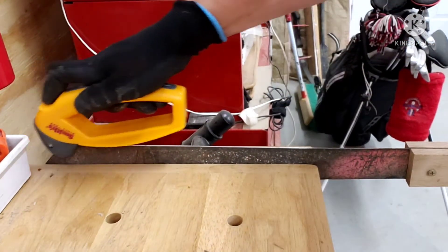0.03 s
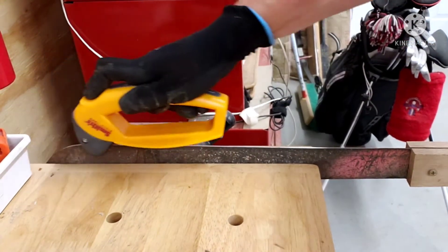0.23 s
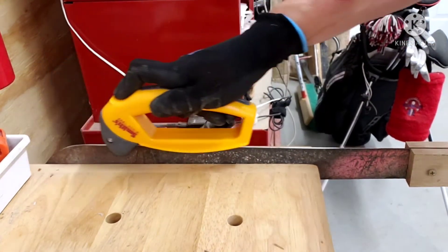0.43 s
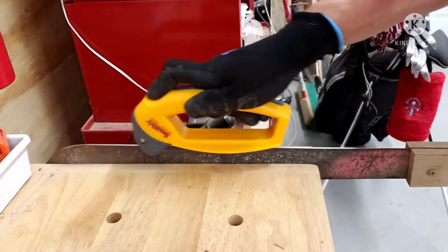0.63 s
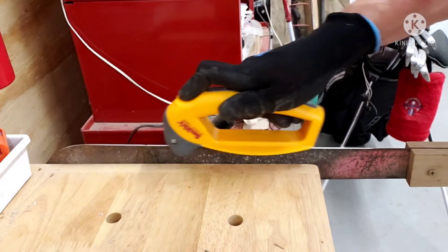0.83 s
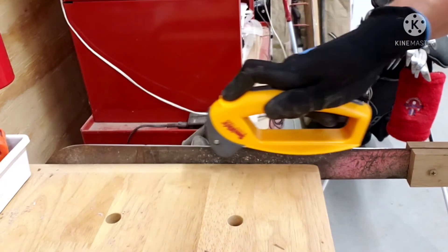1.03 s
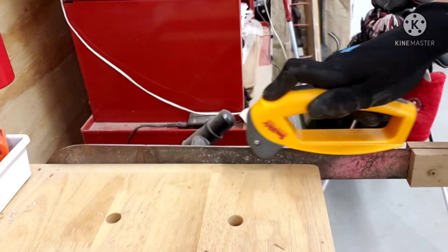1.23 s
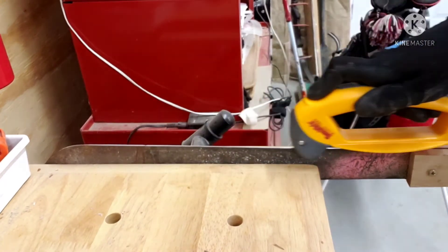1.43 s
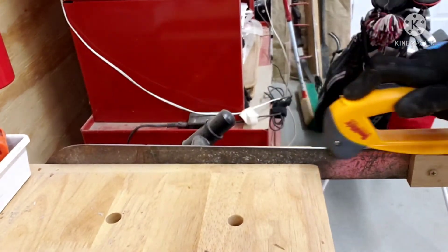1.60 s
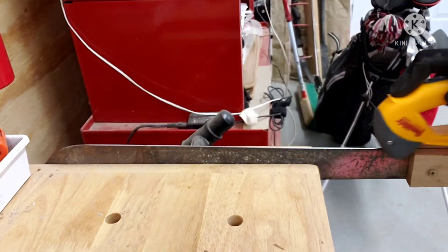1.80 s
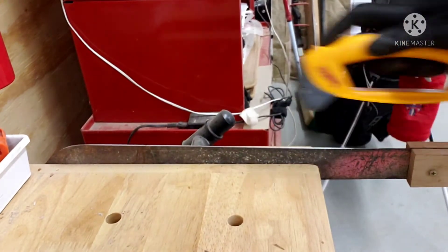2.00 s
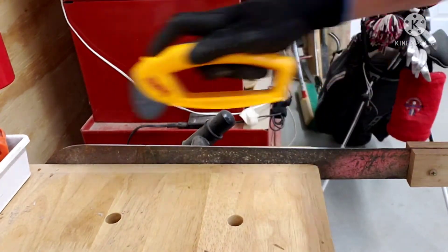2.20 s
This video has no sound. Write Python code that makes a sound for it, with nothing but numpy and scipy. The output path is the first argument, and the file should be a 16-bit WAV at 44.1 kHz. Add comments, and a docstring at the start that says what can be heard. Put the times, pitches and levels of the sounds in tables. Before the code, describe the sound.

A hand sharpener scrapes once along a steel blade, hissing, then drops off with a thump.

```python
"""A hand-held sharpener is drawn once along a machete clamped to a wooden bench in a small workshop.
Its carbide edge tears a dense stream of tiny chips: bright hiss, rasp, brief squeals, the growl and
ring of the blade, a rumble in the bench. It catches on a few nicks, then drops off with a thump;
the blade twangs and the room rings out. The returning hand swishes faintly over quiet room tone."""
import sys
import numpy as np
from scipy import signal
from scipy.fft import rfft, irfft, next_fast_len
from scipy.io import wavfile
from scipy.ndimage import map_coordinates

SR = 44100
rng = np.random.default_rng(int(sys.argv[2]) if len(sys.argv) > 2 else 0)


def master_out(mix):
    """Clip the mix to full scale and print it as 16-bit PCM to the path in sys.argv[1]."""
    frames = np.transpose(np.atleast_2d(mix))
    ceiling = np.clip(frames, -1, 1)
    pcm = np.round(ceiling * 32767).astype(np.int16)
    wavfile.write(sys.argv[1], SR, pcm)


N = 103635

# Spectral shapes: freq_hz, relative_db
ROOM_TONE_EQ = [(20,-15.5),(50,2),(150,-5.5),(400,-7),(750,-10),(1500,-17),(10500,-20),(15000,-12.5)]
SWISH_EQ = [(9000,-24.5),(11300,-12.5),(12000,-0.5),(15000,-4.5)]
THUMP_EQ = [(25,-31),(65,3.5),(130,3),(210,0),(320,5),(430,1.5),(560,-10),(1000,-19),(3000,-25)]
CLICK_EQ = [(200,-29.5),(700,6),(1000,18.5),(1500,-1),(1900,-1.5),(3000,5),(7000,-14.5),(10000,-30)]
RUMBLE_EQ = [(40,-33),(65,-1.5),(90,4),(115,5),(160,-0.5),(200,-2.5),(300,0),(600,-20),(2000,-70.5)]
GROWL_EQ = [(100,-14),(190,0),(320,5.5),(550,2),(800,0.5),(950,-6.5),(1060,-3),(1200,4),(1500,-2.5),(1780,-3.5),(3000,-12.5)]
RASP_EQ = [(1000,-12),(1800,-8),(2150,13),(2600,9),(3200,4.5),(3650,2),(3850,4),(4200,0),(4600,4.5),(5300,4.5),(6000,4.5),(7000,5),(7450,8.5),(7850,3.5),(8300,-1.5),(12000,-8)]
HISS_EQ = [(6000,-49.5),(8300,-32),(9000,-9.5),(9600,-5.5),(10300,-5),(11000,-3),(11350,5.5),(12300,0),(13000,3.5),(13900,4),(14450,0.5),(15400,1)]
# Envelopes: time_s, relative_db
SWISH_LEVELS = [(2.1,-100),(2.27,-66.5),(2.35,-81.5)]
RUMBLE_LEVELS = [(0,-40),(.3,-47.5),(.7,-43.5),(.95,-56.5),(1.1,-52),(1.7,-64),(1.85,-53)]
GROWL_LEVELS = [(0.0, -76), (0.11, -29), (0.3, -33.5), (0.6, -35.5), (0.675, -32), (0.73, -39),
                (1.05, -38.5), (1.2, -40), (1.34, -37.5), (1.394, -33), (1.426, -45), (1.462, -33),
                (1.55, -42), (1.65, -35), (1.716, -32.5), (1.79, -40), (1.87, -45)]
# Stroke envelope: time_s, hiss_relative_db, rasp_relative_db
STROKE_LEVELS = [(0.0, -47, -46.5), (0.052, -44.5, -44), (0.11, -33, -37), (0.146, -37, -41),
                 (0.23, -25, -36), (0.32, -33.5, -42), (0.594, -32.5, -38.5), (0.678, -27.5, -35.5),
                 (0.7, -30.5, -37), (0.726, -26, -33.5), (0.8, -31.5, -36.5), (0.826, -25, -31),
                 (0.878, -28, -34.5), (0.92, -22, -30.5), (1.036, -25.5, -32.5), (1.23, -26.5, -36),
                 (1.258, -29.5, -38), (1.462, -21.5, -33), (1.542, -28.5, -38.5), (1.755, -31, -35),
                 (1.79, -36, -41), (1.89, -48, -44)]
# Room decay: freq_hz, t60_s
ROOM_DECAY = [(100,0.41),(300,0.37),(700,0.42),(2000,0.38),(5000,0.41),(13000,0.4)]
# Left/right likeness, diffuse and direct sound: freq_hz, coherence
ROOM_COHERENCE = [(100,.97),(300,.8),(700,.2),(1500,0)]
DIRECT_COHERENCE = [(100,.98),(300,.9),(600,.72),(950,.92),(1500,.65),(2500,.3),(6000,.2),(13000,.15)]
# Direct sound balance: freq_hz, left_minus_right_db
BALANCE = [(60,-3.5),(150,-6),(420,-7),(900,-5),(1900,2),(3800,-0.5),(7500,1.5),(13000,4.5)]
# Direct sound phase: freq_hz, left_lead_rad
PHASE_LEAD = [(60,.1),(250,0),(450,-.5),(800,-2.1),(1050,-1.9),(1400,-.4),(2400,-1),(3200,0),(5000,-2),(12000,-1.6)]
# Cutter at tip, one third, two thirds, near heel, heel: time_s
STATION_TIMES_S = [.15,.6,1.05,1.47,1.85]
# Clamped blade modes: pitch_hz, width_hz, level_db at each of the five stations
BLADE_MODES = [(150,12,-52.5,-49.5,-53.5,-44.5,-58.5),(244,14,-62,-50.5,-50.5,-57.5,-77.5),(427,58,-58,-63.5,-45,-47.5,-44),(678,110,-48,-46.5,-46,-57,-46.5),(773,120,-53,-54.5,-39.5,-48,-63.5),(941.6,35,-59.5,-55,-40,-49,-57.5),(1133,22,-52,-53,-49.5,-63.5,-71.5),(1380,64,-61,-67,-48,-41.5,-55)]
# Nicks and final drop: start_s, thump_db, click_db
CATCHES = [(.498,-31,-27),(.6705,-23,-23),(.678,-25,-34),(.6945,-20,-19),(1.096,-29,-18),(1.371,-30,-22),(1.454,-33,-21),(1.8965,-18,-26),(1.906,-24,-42)]
# Squeals and groans: centre_s, sigma_s, pitch_hz, width_hz, level_db
SQUEAL_EVENTS = [(.235,0.058,11500,170,-33.5),(0.21,0.078,745,70,-48),(0.473,0.14,2278,70,-44.5),(0.37,0.086,13600,297.5,-33.5),(1.2,0.09,7400,130,-39),(1.1,0.12,11350,310,-32),(1.44,0.081,12000,700,-24),(1.442,0.073,810,55,-37),(1.55,0.018,146,11,-43.5),(1.755,0.04,18000,300,-42),(1.848,0.011,470,290,-36)]

LIFT_S = 1.897  # tool leaves the edge
TIME_S = np.arange(N) / SR


def amp(db):
    """Decibels to gain."""
    return 10 ** (np.asarray(db) / 20)


def unit_rms(x):
    return x / np.sqrt(np.mean(x ** 2) + 1e-20)


def unit_peak(x):
    return x / np.abs(x).max()


def impulse(start_s):
    return 1.0 * (np.arange(N) == round(start_s * SR))


def at_hz(points, hz):
    """Interpolate (freq_hz, value) on a log axis."""
    knots_hz, values = np.transpose(points)
    return np.interp(np.log(hz + 1), np.log(knots_hz + 1), values)


def curves(rows):
    """Per-sample curve for each column after time_s."""
    knots_s, *columns = np.transpose(rows)
    return [np.interp(TIME_S, knots_s, column) for column in columns]


def wobble(rate_hz):
    """Smooth random curve."""
    return map_coordinates(rng.standard_normal(N), [TIME_S * rate_hz], mode="mirror")


def filtered(x, response):
    """Apply a complex response(hz)."""
    size = 2 * next_fast_len(N)
    return irfft(rfft(x, size) * response(np.fft.rfftfreq(size, 1 / SR)), size)[..., :N]


def coloured(x, eq):
    """Minimum-phase filter shaped by (freq_hz, gain_db)."""
    def response(hz):
        cepstrum = irfft(np.log(amp(at_hz(eq, hz))))
        half = len(cepstrum) // 2
        cepstrum[1:half] *= 2
        cepstrum[half + 1:] = 0
        return np.exp(rfft(cepstrum))
    return filtered(x, response)


def resonate(x, modes):
    """Parallel resonators: pitch_hz, width_hz, gain_db."""
    def response(hz):
        return sum(amp(db) * 1j * hz * width_hz / (pitch_hz ** 2 - hz ** 2 + 1j * hz * width_hz)
                   for pitch_hz, width_hz, db in modes)
    return filtered(x, response)


def stereo(pair, coherence):
    """Mix two unrelated signals, as mid and side, to left and right."""
    def weights(hz):
        angle_rad = np.arccos(np.clip(at_hz(coherence, hz), -1, 1)) / 2
        return np.array([np.cos(angle_rad), np.sin(angle_rad)])
    mid, side = filtered(pair, weights)
    return np.array([mid + side, mid - side])


def direct_path(pair):
    """Direct sound arrives left and right with level and phase differences."""
    def response(hz):
        left = amp(at_hz(BALANCE, hz) / 2) * np.exp(.5j * at_hz(PHASE_LEAD, hz))
        return np.array([left, 1 / left])
    return filtered(stereo(pair, DIRECT_COHERENCE), response)


def room_tone(level_db=-77):
    """Steady diffuse background noise."""
    noise = stereo(rng.standard_normal((2, N)), ROOM_COHERENCE)
    return amp(level_db) * unit_rms(coloured(noise, ROOM_TONE_EQ))


def workshop_reverb(x, predelay_s=0.0065):
    """Diffuse room tail; each frequency decays at its own rate."""
    hz, time_s, spectrum = signal.stft(rng.standard_normal((2, SR // 2)), SR, nperseg=256)
    decay = np.exp(-np.log(1000) * time_s / at_hz(ROOM_DECAY, hz)[:, None])
    tail = signal.istft(spectrum * decay, SR, nperseg=256)[1]
    tail = np.pad(tail / np.linalg.norm(tail[0]), ((0, 0), (round(predelay_s * SR), 0)))
    return stereo(signal.fftconvolve(x[None], tail, axes=1)[:, :N], ROOM_COHERENCE)


def hand_swish():
    """The returning hand: a faint swell of high noise."""
    return amp(curves(SWISH_LEVELS)[0]) * unit_rms(coloured(rng.standard_normal((2, N)), SWISH_EQ))


def twang(level_db=-24):
    """The freed blade springs back in its three lowest modes; mid only."""
    modes = [(hz, width_hz, -20 * np.log10(width_hz)) for hz, width_hz, *_ in BLADE_MODES[:3]]
    swing = unit_peak(resonate(impulse(LIFT_S), modes))
    return np.array([amp(level_db) * swing, np.zeros(N)])


def knocks(click_decay_s=0.0065, ring_db=-9):
    """Each catch thumps the bench, rings the blade and clicks in the tool; mid only."""
    modes = [(hz, width_hz, max(db) - 10 * np.log10(width_hz)) for hz, width_hz, *db in BLADE_MODES]
    mid = np.zeros(N)
    for start_s, thump_db, click_db in CATCHES:
        blow = coloured(impulse(start_s), THUMP_EQ)
        ring = amp(ring_db) * unit_peak(resonate(blow, modes))
        age_s = TIME_S - start_s
        burst = rng.standard_normal(N) * (age_s >= 0) * np.exp(-np.abs(age_s) / click_decay_s)
        mid += amp(thump_db) * (unit_peak(blow) + ring)
        mid += amp(click_db) * unit_peak(coloured(burst, CLICK_EQ))
    return np.array([mid, np.zeros(N)])


def bench_rumble(force):
    """Chips shake the bench, most while the tool is over it."""
    return amp(curves(RUMBLE_LEVELS)[0]) * unit_rms(coloured(force, RUMBLE_EQ))


def blade_ring(force):
    """Low blade modes; each level follows the cutter's position."""
    drive = coloured(force, [(70, -16), (135, -4)])
    ring = np.zeros((2, N))
    for hz, width_hz, *station_db in BLADE_MODES:
        gain = amp(np.interp(TIME_S, STATION_TIMES_S, station_db))
        ring += gain * unit_rms(resonate(drive, [(hz, width_hz, 0)]))
    return ring


def squeals(force):
    """The passing cutter briefly brings out narrow resonances."""
    out = np.zeros((2, N))
    for centre_s, sigma_s, hz, width_hz, level_db in SQUEAL_EVENTS:
        swell = np.exp(-.5 * ((TIME_S - centre_s) / sigma_s) ** 2)
        out += amp(level_db) * swell * unit_rms(resonate(force, [(hz, width_hz, 0)]))
    return out


def steel_ring(force, count=80, low_hz=2400, high_hz=7600, width_hz=45, ring_db=-1.5):
    """Chip force plus the high blade modes that ring after each chip."""
    pitches_hz = low_hz + (high_hz - low_hz) * (np.arange(count) + rng.random(count)) / count
    ring = resonate(force, [(hz, width_hz, 0) for hz in pitches_hz])
    return unit_rms(force) + amp(ring_db) * unit_rms(ring)


def moving_contact(x, depth_db, width_hz, life_s):
    """Narrow peaks and dips come and go as the contact travels along the steel; unit rms out."""
    hz, time_s, spectrum = signal.stft(x, SR, nperseg=1024)
    grid = np.meshgrid(hz / width_hz, time_s / life_s, indexing="ij")
    ripple = map_coordinates(rng.standard_normal((len(hz), len(time_s))), grid, mode="mirror")
    rippled = spectrum * amp(depth_db * np.minimum(ripple, 2))
    # hold each frame's energy
    rippled *= np.linalg.norm(spectrum, axis=(0, 1)) / (np.linalg.norm(rippled, axis=(0, 1)) + 1e-20)
    return unit_rms(signal.istft(rippled, SR, nperseg=1024)[1][:, :N])


def chips(rate_hz=13000, scatter_db=2.6, cap_db=7, judder_db=2, grip_db=.5):
    """Tiny uneven fractures, bunched by fast cutter judder and slower grip tremor."""
    size_db = scatter_db * rng.standard_normal(N) + judder_db * wobble(rate_hz=650)
    size_db = np.minimum(size_db, cap_db) + grip_db * wobble(rate_hz=50)
    pulses = rng.uniform(-0.94, 1, (2, N)) * amp(size_db)
    breaks = rng.random(N) < rate_hz / SR
    return unit_rms(pulses * breaks)


def scrape(release_t20_s=.006):
    """One chip stream drives cutter, blade and bench until the tool lifts."""
    force = chips() * amp(-20 * np.maximum(TIME_S - LIFT_S, 0) / release_t20_s)
    hiss = moving_contact(coloured(force, HISS_EQ), depth_db=2.5, width_hz=210, life_s=0.0738)
    rasp = moving_contact(coloured(steel_ring(force), RASP_EQ), depth_db=5, width_hz=145, life_s=0.07504)
    growl = moving_contact(coloured(force, GROWL_EQ), depth_db=1.5, width_hz=94, life_s=0.13)
    hiss_db, rasp_db = curves(STROKE_LEVELS)
    growl_db = curves(GROWL_LEVELS)[0]
    cutting = amp(hiss_db + 4.5) * hiss + amp(rasp_db + 1.5) * rasp + amp(growl_db - 5) * growl
    return bench_rumble(force) + blade_ring(force) + squeals(force) + cutting


def scene(stroke_send_db=-6, impact_send_db=-13.5):
    """Stroke and impacts, direct and reverberant, over a faint background."""
    stroke = scrape()
    impacts = knocks() + twang()
    background = room_tone() + hand_swish()
    reverb = workshop_reverb(amp(stroke_send_db) * stroke[0] + amp(impact_send_db) * impacts[0])
    return background + reverb + direct_path(stroke + impacts)


def record(dry, cutoff_hz=15480):
    """Steep low-pass."""
    return filtered(dry, lambda hz: 1 / np.hypot(1, (hz / cutoff_hz) ** 400))


dry = scene()
out = record(dry)
master_out(out)
```